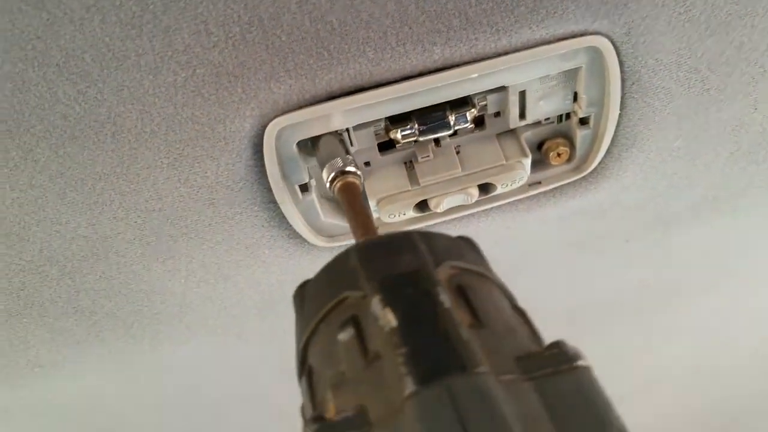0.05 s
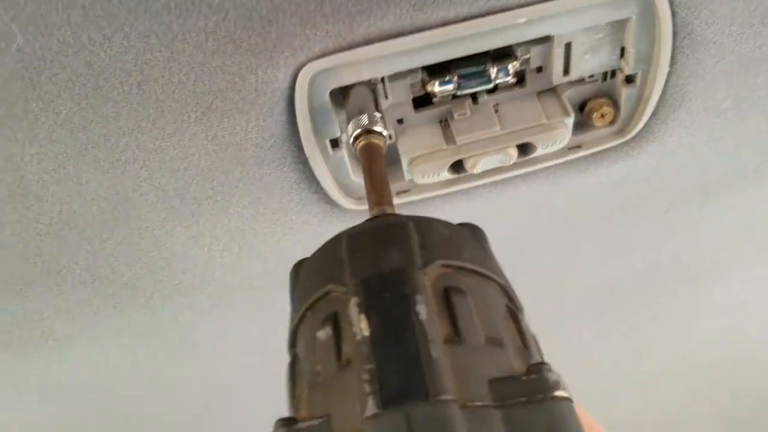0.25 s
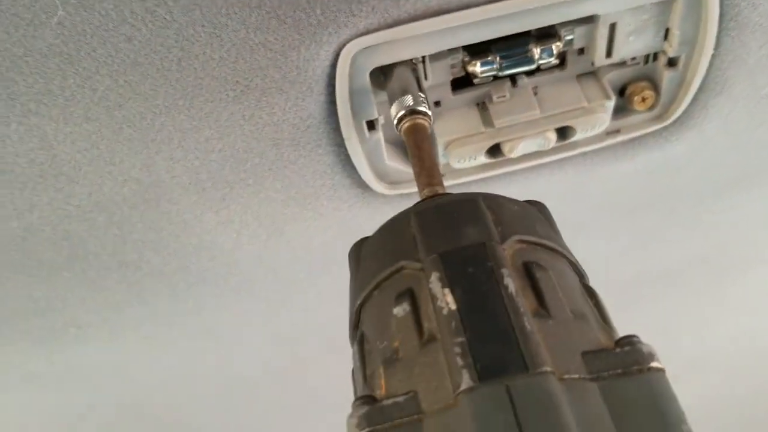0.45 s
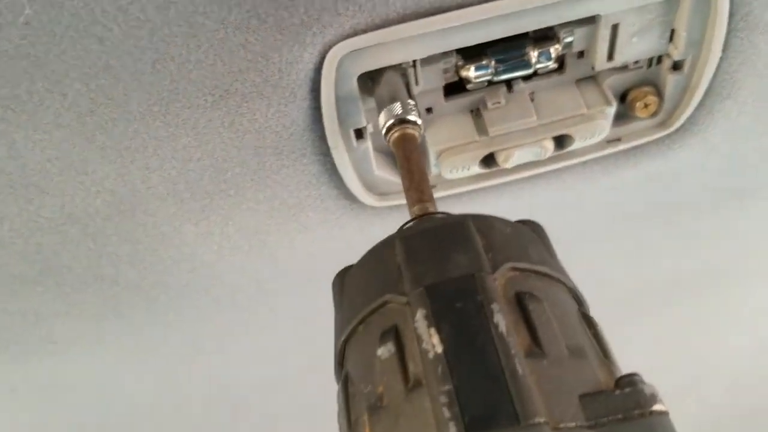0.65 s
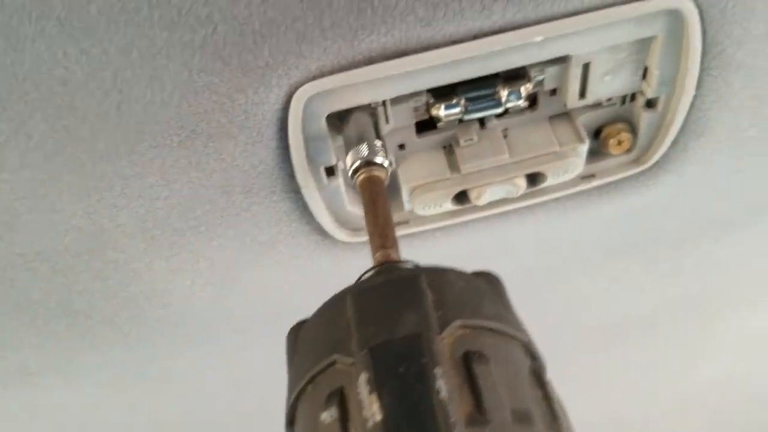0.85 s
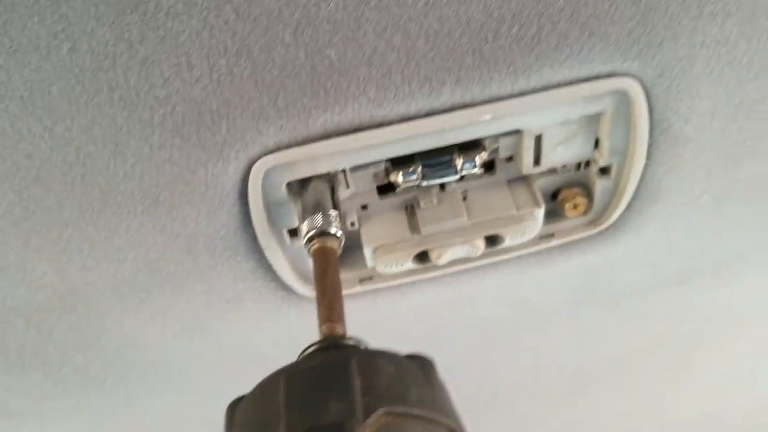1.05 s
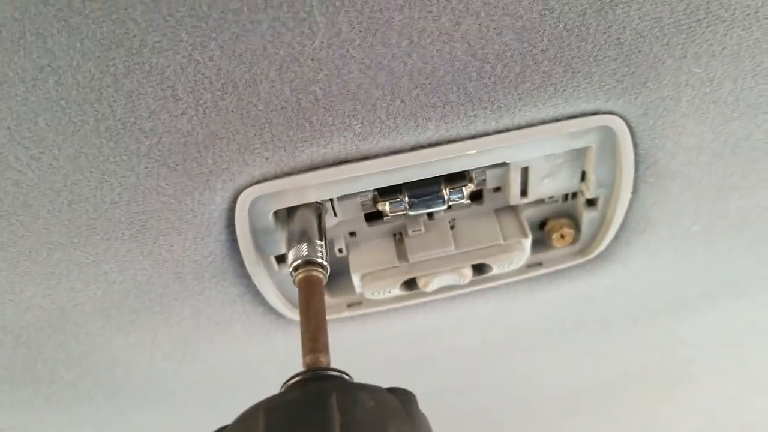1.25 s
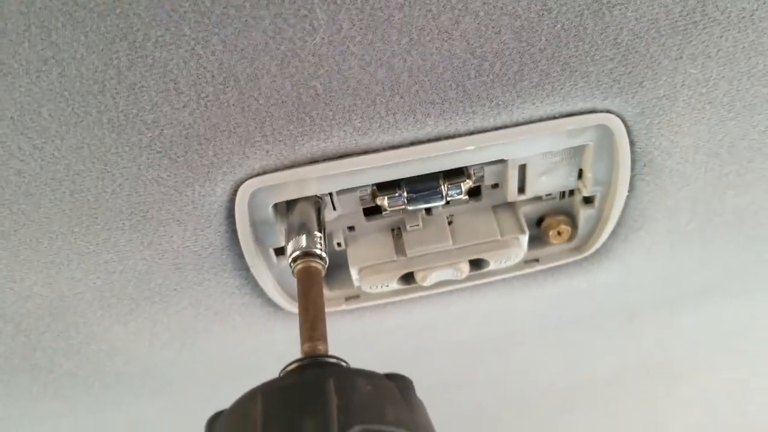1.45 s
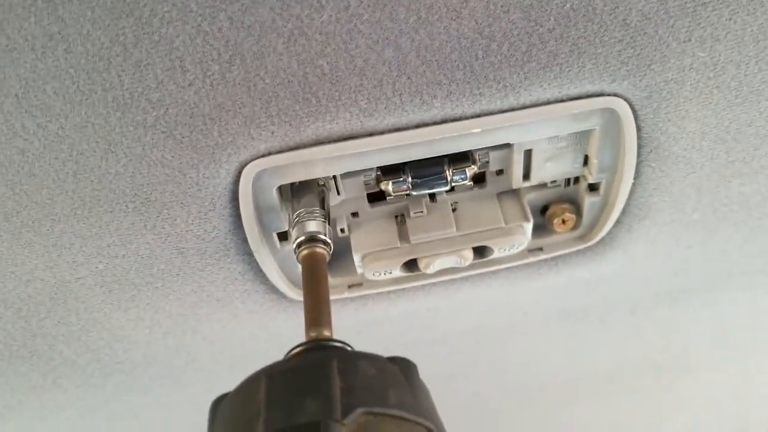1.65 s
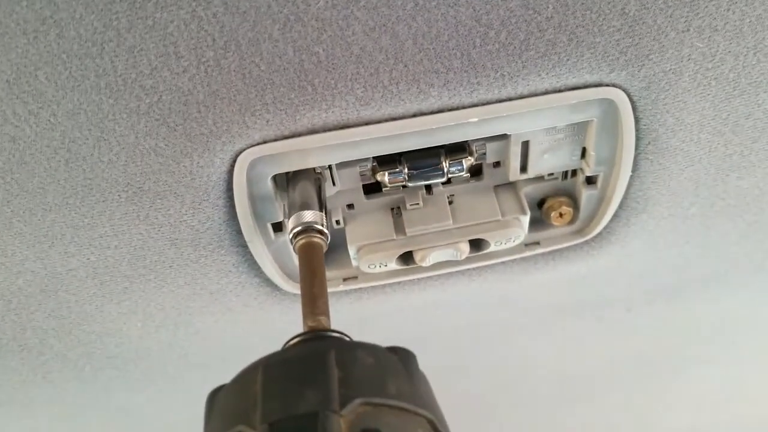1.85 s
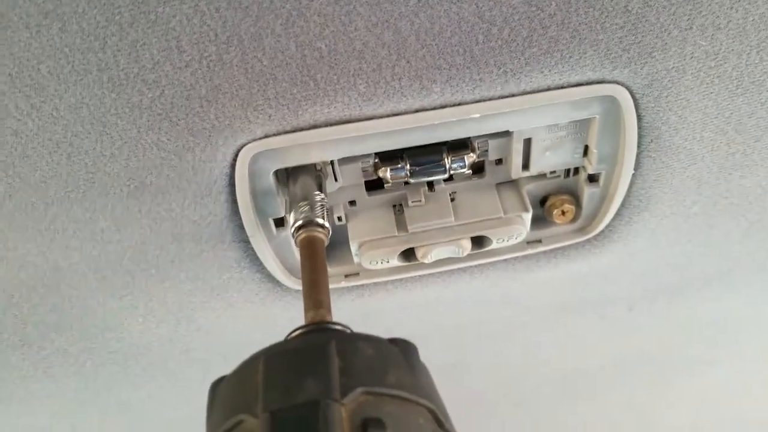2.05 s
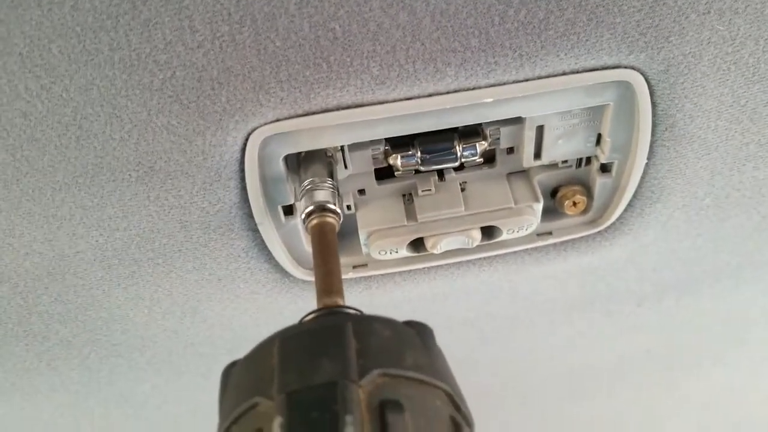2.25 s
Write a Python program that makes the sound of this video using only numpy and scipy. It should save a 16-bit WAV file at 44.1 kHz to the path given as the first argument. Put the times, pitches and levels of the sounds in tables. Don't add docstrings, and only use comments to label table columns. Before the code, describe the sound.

Drill at a car's ceiling lamp: a quick burst of hollow plastic knocks, a separate knock, near silence with handling rumble, then a high steady motor whine, gear ticks, rough rasp and two main thumps, heard close.

```python
import sys
import numpy as np
from scipy import signal
from scipy.io import wavfile

SR = 44100
rng = np.random.default_rng(int(sys.argv[2]) if len(sys.argv) > 2 else 0)


def gain_from_db(level_db):
    decades = np.asarray(level_db, float) / 20
    return 10 ** decades


def master(y):
    cut = np.clip(np.atleast_2d(y).T, -1, 1)
    pcm = np.round(cut * 32767)
    wavfile.write(sys.argv[1], SR, pcm.astype(np.int16))


N = 101429

# (time [s], contact length [s], boom [dB], body [dB], crack [dB])
KNOCKS = [(.001, 0.001, -47, -59, -59), (.045, 0.012, -53, -56, -67.5), (.075, 0.016, -54, -57.5, -84),
          (.206, 0.0021, -34, -20, -36.5), (.2085, 0.003, -19.5, -21, -30),
          (.213, 0.0077, -36.5, -30.5, -36.5), (.219, 0.011, -34, -27.5, -39.5),
          (.228, 0.0025, -31.5, -25.5, -32), (.234, 0.007, -28, -25, -38), (.241, .008, -32, -36, -49.5),
          (.250, .01, -35.5, -30.5, -54.5), (.258, .01, -30.5, -33.5, -59.5), (.268, .01, -30.5, -35, -55),
          (.279, 0.017, -24.5, -22, -42.5), (.285, 0.0086, -49, -26, -45), (.293, 0.0037, -22.5, -31, -39),
          (.299, .008, -34, -43, -42), (.307, 0.0072, -35.5, -33.5, -45.5), (.316, .01, -32.5, -43, -62),
          (.345, 0.016, -35, -49, -61), (.455, 0.012, -42.5, -68, -104), (.641, 0.0022, -28.5, -21.5, -29),
          (.646, 0.01, -51, -29.5, -57), (.67, 0.067, -42.5, -38.5, -59), (1.409, 0.001, -73, -87, -63.5),
          (1.42, 0.015, -73, -70, -71)]
# (time [s], contact length [s], boom [dB], body [dB], crack [dB])
JOLTS = [
    (1.543, 0.00065, -61, -59.5, -62),
    (1.568, 0.0038, -46, -76, -75),
    (1.677, 0.0022, -29, -37.5, -65),
    (1.722, 0.0031, -38, -39, -80),
    (1.748, .005, -57, -54, -73),
    (1.990, 0.0049, -27, -31.5, -58),
    (2.008, 0.0045, -41, -49, -60),
    (2.03, 0.0051, -38.5, -56, -55),
    (2.06, .005, -42.5, -65, -65),
]
# (frequency [Hz], level [dB], t60 [s])
PANEL_MODES = [(41, -8, 0.2), (62, -6.5, 0.5), (85.9, 3, 0.38), (102.9, -10.5, 1), (121.2, 4.5, 0.2),
               (140, -5.5, 0.5), (196, -4.5, 0.46)]
# (frequency [Hz], width [Hz], level [dB])
HOUSING = [(250, 6.6, -8), (292.6, 5.8, 9), (407, 24, 4.5), (500, 13, -3), (535.8, 21, 8), (587, 32, 14),
           (714.7, 18, 5.5), (910, 36, -1), (1263.4, 56, 5), (1524, 39, 4), (1910, 130, 9), (2216, 33, 1.5),
           (2440, 140, 1.5), (2960, 120, -0.5)]
# (frequency [Hz], level [dB], fast t60 [s], slow t60 [s])
TAIL = [(41, -15.5, 0.21, 0.83), (100, -13, 0.66, 1), (216, -18.5, 0.18, .9), (330, -16.5, 0.26, 0.91),
        (577, -18, 0.12, 0.4), (1200, -13, 0.098, .16), (2243, -12.5, 0.04, 0.1),
        (5900, -12.5, 0.029, 0.051), (14860, -13.5, 0.015, 0.064)]
# (frequency [Hz], left-right likeness [0..1])
KNOCK_LIKE = [(40, .95), (100, 0.96), (240, .8), (550, 0.82), (1300, .25), (15000, 0)]
# (frequency [Hz], left minus right [dB])
KNOCK_PAN = [(60, 0), (140, -1.2), (300, .7), (600, 4.8), (1300, 1), (2500, 4), (5000, 1), (15000, 2.5)]

# (time [s], commutator ripple [Hz], rasp level by load [dB])
MOTOR = [(1.535, 89.54, -71.5), (1.558, 100, -63), (1.584, 103.8, -48), (1.609, 108.1, -43.5),
         (1.649, 104.6, -45.5), (1.691, 127.5, -42.5), (1.75, 147.2, -44.5), (1.818, 140, -39.5),
         (1.861, 138.4, -41), (1.971, 142.4, -43.5), (2.009, 144.6, -39.5), (2.032, 157.1, -45),
         (2.082, 153.5, -40), (2.15, 141.7, -42), (2.279, 127.8, -40.5), (2.3, 127.8, -41.5)]
# (stalled [dB], running [dB], lower ripple line [dB], upper ripple line [dB])
WHINE = [(-45, -45.5, -68, -54), (-64, -60, -74, -67), (-67, -60, -62, -66), (-78, -69, -80, -69)]
# (left minus right [dB], left lead [rad])
WHINE_SIDE = [(6.5, -1.6), (-4, -2.0), (2, 2.4), (8, -.9)]
# (frequency [Hz], density [dB per Hz])
RASP = [(88, -52), (150, -4), (444, -18.5), (539, -8.5), (945, -13.5), (1340, -9), (3820, -17), (4120, -16),
        (15400, -26.5)]
# (frequency [Hz], width [Hz], level [dB])
CASING = [(520.5, 18, 9), (606, 70, 10), (1211, 20, 4), (1353, 42, 3), (1488, 44, 2.5), (1698, 48.5, 1.5),
          (3360, 600, 5), (4860, 1100, 9.5), (7940, 670, 8.5), (11600, 1600, 1.5), (14330, 3300, 12)]
# (frequency [Hz], left-right likeness, clipped to [0..1])
DRILL_LIKE = [(60, 0.02), (240, 0.29), (950, 0.6), (3770, -2), (15000, -0.02)]
# (frequency [Hz], left minus right [dB])
DRILL_PAN = [(60, 0), (180, -4.5), (550, 1.5), (1650, 0.5), (4970, 2), (15000, 2)]
# (time [s], level [dB])
CATCHES = [
    (1.575, -49),
    (1.580, -45),
    (1.589, -41),
    (1.594, -49),
    (1.597, -51),
    (1.604, -38),
    (1.612, -41),
    (1.619, -35),
]
# (frequency [Hz], level [dB], t60 [s])
CATCH_MODES = [(3230, -5, 0.011), (4820, 1.5, 0.0098), (5150, -11, 0.0045), (8250, -10.5, 0.0051)]

# (frequency [Hz], density [dB per Hz])
RUMBLE = [(12, -55), (20, -21.5), (40, -4), (69, 9), (108, -5), (201, -16), (433, -41), (585, -48.5),
          (900, -61), (1170, -95), (1980, -120)]
# (time [s], level [dB])
HAND = [
    (0.0, -40.5),
    (0.198, -49.5),
    (0.39, -39),
    (0.93, -50.5),
    (1.151, -45.5),
    (1.35, -49.5),
    (1.45, -48),
    (2.3, -45.5),
]
# (frequency [Hz], density [dB per Hz])
HISS = [(350, -29), (600, 5.5), (642, -4.5), (809, -12), (1450, -7.5), (2180, -13), (2460, -12),
        (9070, -19.5), (15400, -7)]
# (frequency [Hz], left-right likeness [0..1])
FLOOR_LIKE = [(60, 0.27), (240, 0.7), (950, 0.12), (3770, 0.03), (15000, 0.03)]
# (frequency [Hz], left minus right [dB])
FLOOR_PAN = [(60, -1.5), (240, 0), (950, -1), (3770, 1.5), (15000, -1)]

BAND_EDGES_HZ = 22 * 2 ** np.arange(0, 9.9, 1 / 3)
HISS_DB, RUSTLE_DB, RUSTLE_T60_S = -78, 16, 0.45
SLOW_DB, RISE_CYCLES, CRACK_DB, CRACK_T60_S = -28, 0.44, 5.5, 0.0022
PANEL_DB, CONTACT_HZ = -5, 2400
STRUCK_DB = -12
TRIGGER_S, BREAKAWAY_S, SWITCH_S, HANDOVER_S = 1.537, 1.566, 0.0017, 0.007
STALL_HZ, CHOP_HZ, CHOP_DRIFT_HZ = 3922, 3804, 5.5
STALL_SWELL_DB, WHINE_WOBBLE_DB, RIPPLE_JITTER_HZ = 5.0, 1.2, 2.5
GEAR_DEPTH, GEAR_RATIO = 0.21, 1.21
GRIT_PER_S, GRIT_SHARE = 3000, 0.21
RASP_DB, GROWL_DB = 5.5, -1.5
TOOTH_DB, TOOTH_JITTER, TOOTH_HZ = -10, 0.05, 1400
MIC_TOP_HZ, MIC_END_HZ = 15450, 16200


def rms_one(x):
    return x / np.sqrt(np.mean(x ** 2) + 1e-20)


def clock():
    return np.arange(N) / SR


def at_hz(points, hz, axis=1):
    p = np.array(points, float)
    return np.interp(np.log(hz), np.log(p[:, 0]), p[:, axis])


def left_right(pan_db):
    return gain_from_db(pan_db / 2 * np.array([[1], [-1]]))


def filtered(x, order, hz, kind="low"):
    return signal.sosfilt(signal.butter(order, hz, kind, fs=SR, output="sos"), x)


def drift(rate_hz):
    r = np.exp(-80 * np.pi * rate_hz / SR)
    white = rng.standard_normal(N // 40 + 2002)
    slow = signal.lfilter([1], [1, -2 * r, r * r], white)[2000:]
    return np.interp(np.arange(N) / 40, np.arange(len(slow)), rms_one(slow))


def ring(x, hz, t60_s):
    r = gain_from_db(-60 / (t60_s * SR))
    w = 2 * np.pi * hz / SR
    return signal.lfilter([0, np.sin(w)], [1, -2 * r * np.cos(w), r * r], x + 1e-18)


def decay(x, t60_s):
    return signal.lfilter([1], [1, -gain_from_db(-60 / (t60_s * SR))], x + 1e-18)


def resonate(x, peaks):
    out = x
    for hz, width_hz, db in peaks:
        b, a = signal.iirpeak(hz, hz / width_hz, SR)
        out = out + gain_from_db(db) * signal.lfilter(b, a, x)
    return out


def bands(white, like, pan, gain, low_hz=0, high_hz=20000):
    out = 0
    for k, (low, high) in enumerate(zip(BAND_EDGES_HZ, BAND_EDGES_HZ[1:])):
        hz = np.sqrt(low * high)
        if low_hz < hz < high_hz:
            mid, side = filtered(white[k % 2], 3, [low, high], "band")
            c = np.clip(at_hz(like, hz), 0, 1)
            stereo = np.sqrt(1 + c) * mid + np.sqrt(1 - c) * side * [[1], [-1]]
            out = out + gain(hz) * left_right(at_hz(pan, hz)) * stereo
    return out


def floor():
    s, db = np.transpose(HAND)
    white = rng.standard_normal((2, 2, N))
    rumble = bands(white, FLOOR_LIKE, FLOOR_PAN,
                   lambda hz: gain_from_db(at_hz(RUMBLE, hz) + 2.7 * drift(3.1)), high_hz=900)
    hiss = bands(white[::-1], FLOOR_LIKE, FLOOR_PAN, lambda hz: gain_from_db(at_hz(HISS, hz)), low_hz=600)
    rustle = 1 + gain_from_db(RUSTLE_DB - 60 * clock() / RUSTLE_T60_S + 1.8 * drift(44))
    grip = gain_from_db(np.interp(clock(), s, db))
    return grip * rms_one(rumble) + gain_from_db(HISS_DB) * rustle * rms_one(hiss)


def impacts():
    return np.array(list(KNOCKS) + list(JOLTS))


def strikes(hz):
    boom, body, crack = impacts().T[2:]
    place = np.interp(np.log(hz), np.log([130, 280, 650, 1900]), [0, 1, 1, 2])
    return gain_from_db(boom + (body - boom) * min(place, 1) + (crack - body) * max(place - 1, 0))


def contacts():
    rows = impacts()
    phase = (clock() - rows[:, :1]) / np.maximum(rows[:, 1:2], 2e-4)
    push = np.sin(np.pi * np.clip(phase, 0, 1)) ** 2
    return push / push.sum(axis=1, keepdims=True)


def tail_gain(hz, push):
    clicks = strikes(hz) @ push
    env = decay(clicks, at_hz(TAIL, hz, axis=2))
    env += gain_from_db(SLOW_DB) * decay(clicks, at_hz(TAIL, hz, axis=3))
    env += gain_from_db(CRACK_DB) * min(hz / 1200, 1) * decay(clicks, CRACK_T60_S)
    r = np.exp(-hz / RISE_CYCLES / SR)
    swelled = signal.lfilter([1 - r], [1, -r], env)
    return gain_from_db(at_hz(TAIL, hz)) * np.sqrt(SR / hz) * swelled


def clatter():
    push = contacts()
    white = rng.standard_normal((2, 2, N))
    tail = bands(white, KNOCK_LIKE, KNOCK_PAN, lambda hz: tail_gain(hz, push))
    return resonate(tail, HOUSING)


def panel():
    at = (impacts()[:, 0] * SR).astype(int)
    housing = [(hz, db + STRUCK_DB, np.log(1000) / np.pi / width_hz) for hz, width_hz, db in HOUSING]
    out = np.zeros((2, N))
    for k, (hz, level_db, t60_s) in enumerate(list(PANEL_MODES) + housing):
        clicks = np.zeros(N)
        spread_db = rng.normal(0, 1, len(at))
        clicks[at] = (-1) ** k * strikes(hz) * gain_from_db(level_db + PANEL_DB + spread_db)
        out += ring(clicks, hz, t60_s) * left_right(at_hz(KNOCK_PAN, hz))
    return filtered(out, 2, CONTACT_HZ)


def whine(ripple_hz):
    t = clock()
    since = t - BREAKAWAY_S
    on = np.clip((t - TRIGGER_S) / SWITCH_S, 0, 1)
    freed = np.clip((since + SWITCH_S) / SWITCH_S, 0, 1)
    turning = np.clip(since / HANDOVER_S, 0, 1) ** 2
    swell = gain_from_db(STALL_SWELL_DB * np.clip(since / (BREAKAWAY_S - TRIGGER_S) + 0.5, -0.5, 0.5))
    stalled = on * swell * (1 - freed)
    chop = 2 * np.pi * np.cumsum(CHOP_HZ + CHOP_DRIFT_HZ * np.clip(since / 0.7, 0, 1)) / SR
    turn = np.exp(2j * np.pi * np.cumsum(ripple_hz + RIPPLE_JITTER_HZ * drift(21.0)) / SR)
    out = 0
    for k, (levels, (pan_db, lead)) in enumerate(zip(WHINE, WHINE_SIDE), 1):
        stall_db, run_db, low_db, up_db = levels
        stall_tone = gain_from_db(stall_db) * stalled * np.exp(2j * np.pi * k * STALL_HZ * t)
        lines = (gain_from_db(run_db) + gain_from_db(low_db) / turn + gain_from_db(up_db) * turn) * np.exp(1j * k * chop)
        run_tone = turning * gain_from_db(WHINE_WOBBLE_DB * drift(24)) * lines
        ports = np.array([[gain_from_db(pan_db) * np.exp(1j * lead)], [1]])
        out = out + np.real(ports * (stall_tone + run_tone)) / abs(ports.mean())
    return np.sqrt(2) * out


def teeth(turn):
    count = np.floor(GEAR_RATIO * turn / (2 * np.pi) + TOOTH_JITTER * drift(60))
    ticks = (np.diff(count, prepend=count[0]) > 0) * gain_from_db(rng.normal(0, 1.7, N))
    return rms_one(filtered(ticks, 2, [TOOTH_HZ / 1.3, TOOTH_HZ * 1.3], "band"))


def rasp(ripple_hz, load_db):
    grit = (rng.random(N) < GRIT_PER_S / SR) * gain_from_db(6.7 * np.minimum(rng.exponential(1, N), 3))
    white = rng.standard_normal((2, 2, N)) * (1 + GRIT_SHARE * rms_one(grit))
    turn = 2 * np.pi * np.cumsum(ripple_hz) / SR
    gear = GEAR_RATIO * turn
    throb = 1 + GEAR_DEPTH * (np.sin(gear + drift(11)) + 0.25 * np.sin(2 * gear + drift(2.2)))
    noise = bands(white * throb, DRILL_LIKE, DRILL_PAN,
                  lambda hz: gain_from_db(at_hz(RASP, hz) + 1.94 * drift(6.2) + 1.3 * drift(31)), low_hz=100)
    source = rms_one(noise) + gain_from_db(TOOTH_DB) * teeth(turn) * gain_from_db([[1.5], [-1.5]])
    cased = rms_one(resonate(source, CASING))
    growl = rms_one(filtered(rng.standard_normal(N), 2, [60, 220], "band"))
    on = np.clip((clock() - TRIGGER_S) / 0.0061, 0, 1)
    return on * gain_from_db(load_db) * (gain_from_db(RASP_DB) * cased + gain_from_db(GROWL_DB) * growl)


def catches():
    s, db = np.transpose(CATCHES)
    at = (s * SR).astype(int)
    out = np.zeros((2, N))
    for hz, level_db, t60_s in CATCH_MODES:
        clicks = np.zeros((2, N))
        spread_db = rng.normal(0, 3.9, (2, len(s)))
        clicks[:, at] = gain_from_db(db + level_db + 1.5 + spread_db)
        out += ring(clicks, hz, t60_s)
    return out


def scene():
    s, hz, db = np.transpose(MOTOR)
    ripple_hz = np.interp(clock(), s, hz)
    load_db = np.interp(clock(), s, db)
    knocks = clatter() + panel()
    drill = whine(ripple_hz) + rasp(ripple_hz, load_db) + catches()
    return floor() + knocks + drill


def low_pass(x):
    return signal.sosfilt(signal.butter(12, 16830, fs=SR, output="sos"), x)


def record(dry):
    step = signal.ellip(6, 1, 21, MIC_TOP_HZ, fs=SR, output="sos")
    cut = signal.cheby2(10, 40, MIC_END_HZ * 1.02, fs=SR, output="sos")
    mix = signal.sosfilt(np.vstack([step, cut]), dry)
    return low_pass(mix)


dry = scene()
out = record(dry)
master(out)
```